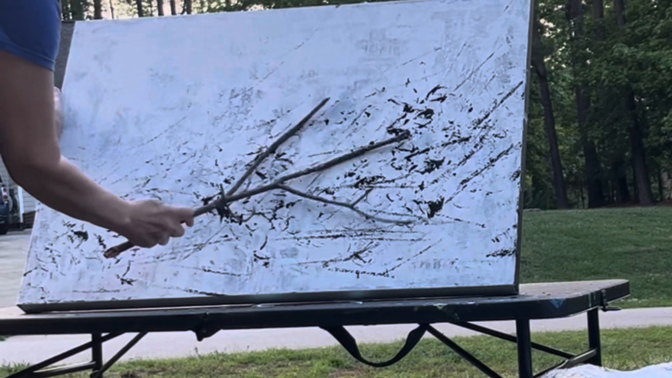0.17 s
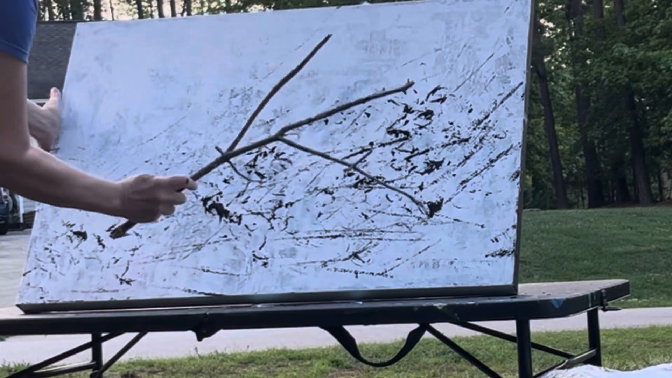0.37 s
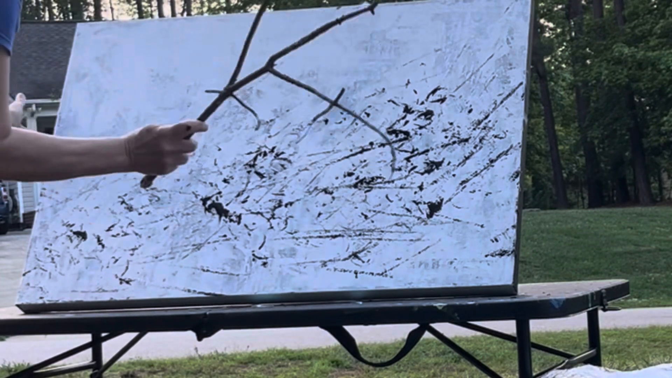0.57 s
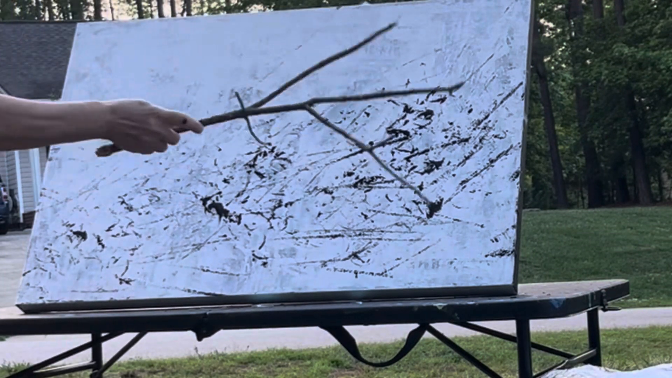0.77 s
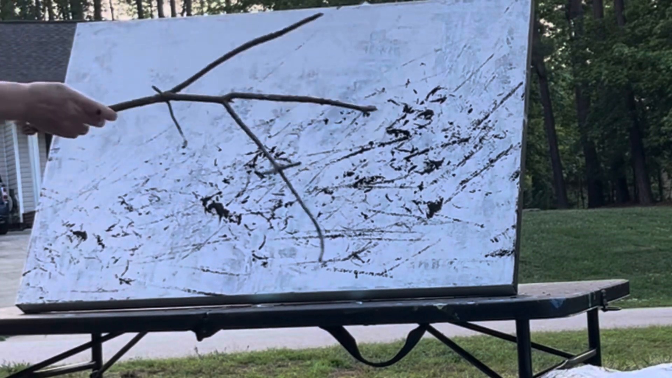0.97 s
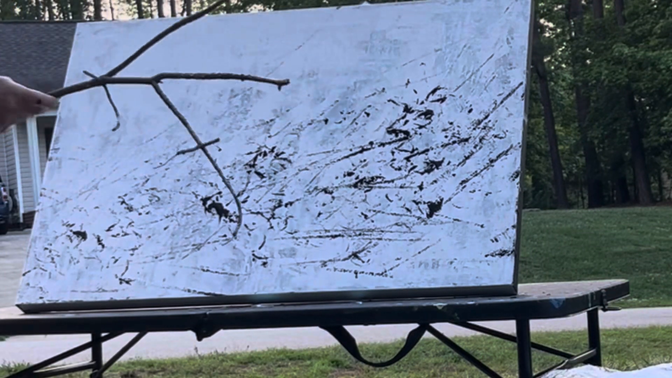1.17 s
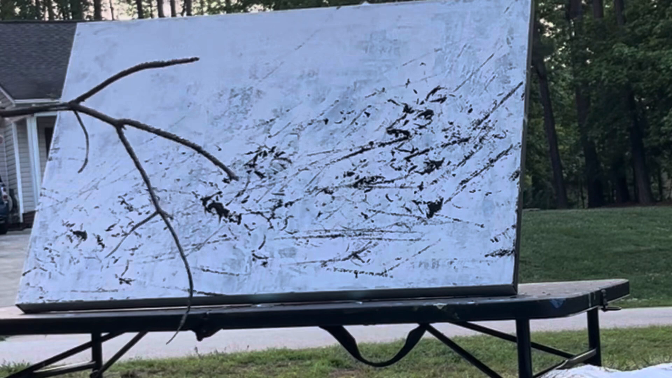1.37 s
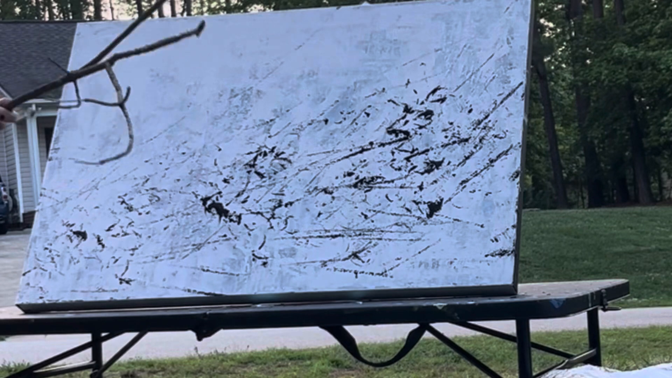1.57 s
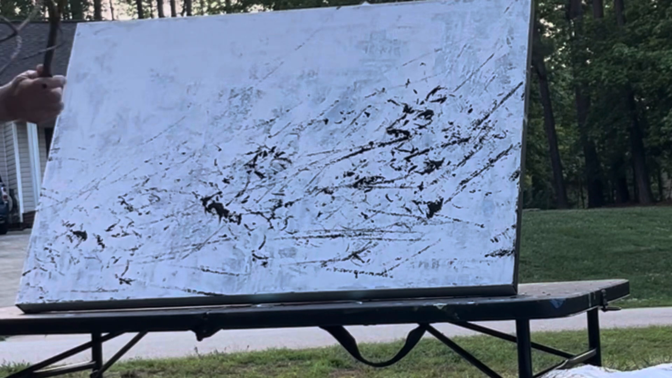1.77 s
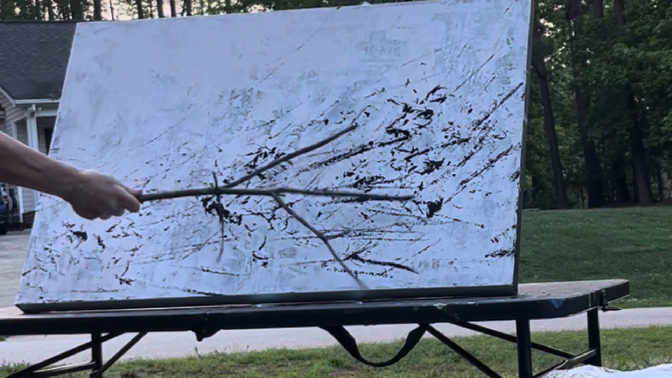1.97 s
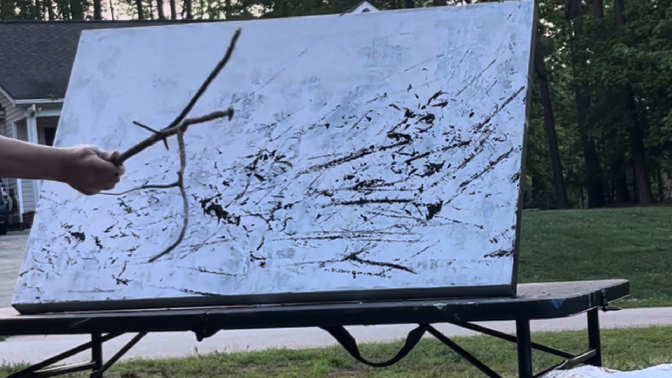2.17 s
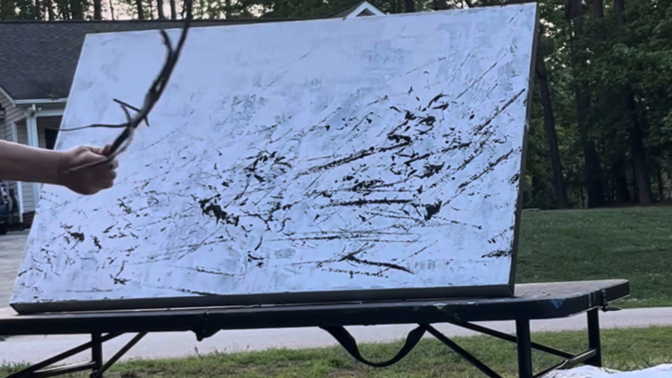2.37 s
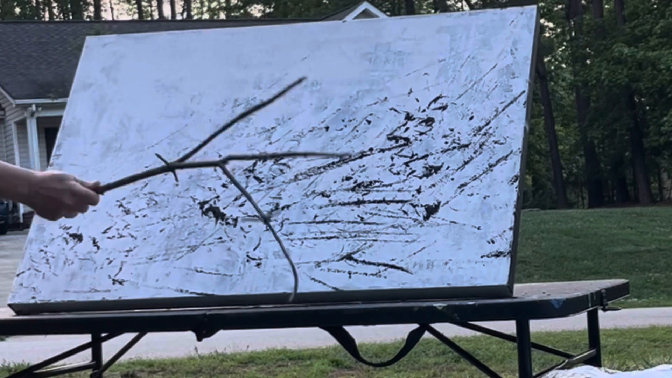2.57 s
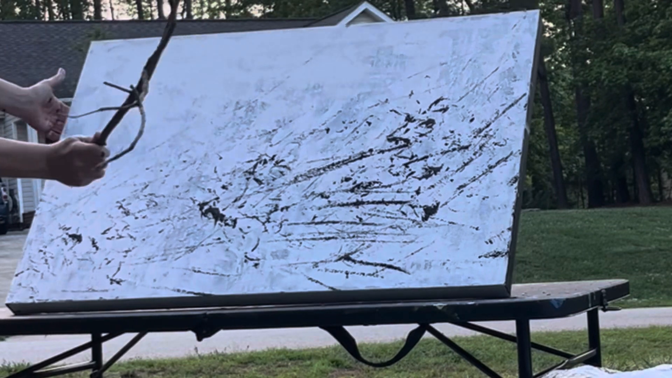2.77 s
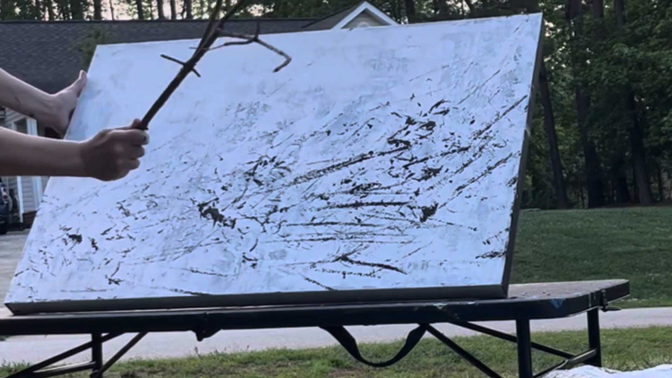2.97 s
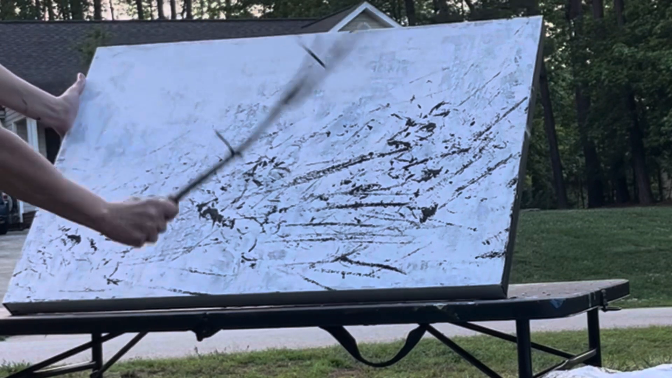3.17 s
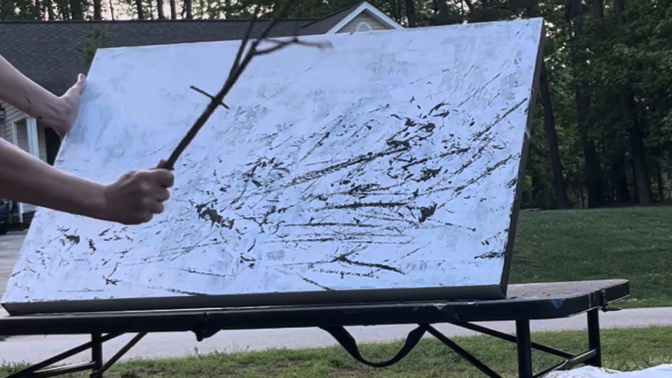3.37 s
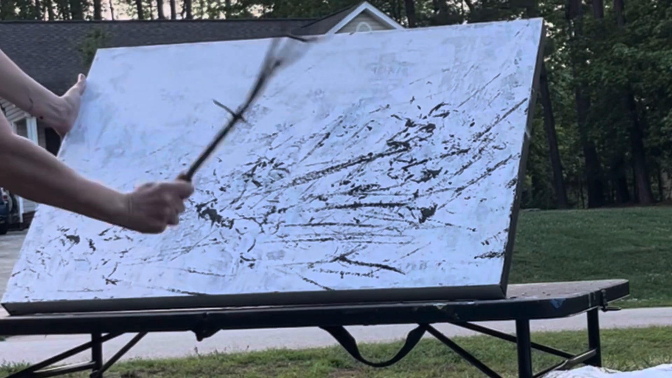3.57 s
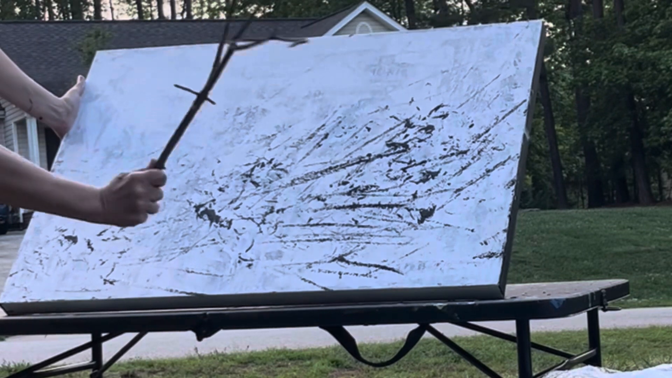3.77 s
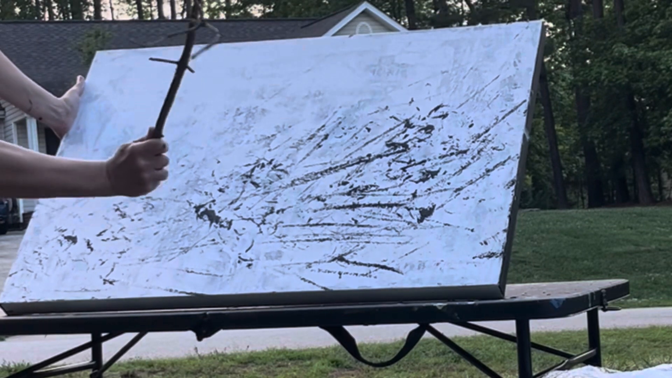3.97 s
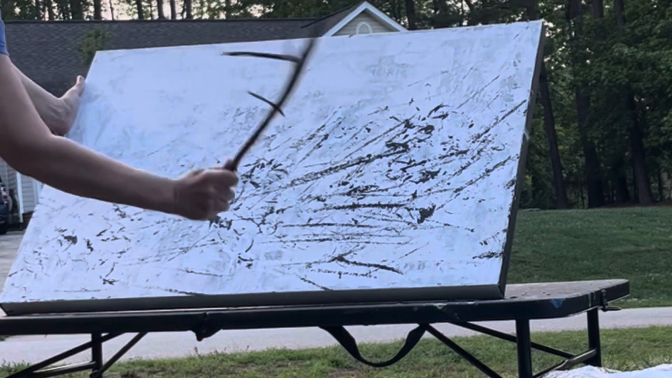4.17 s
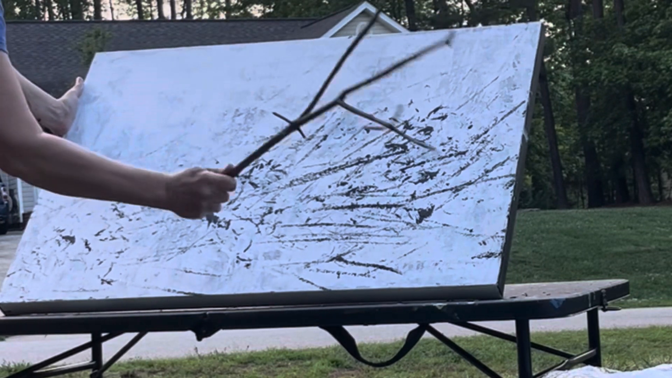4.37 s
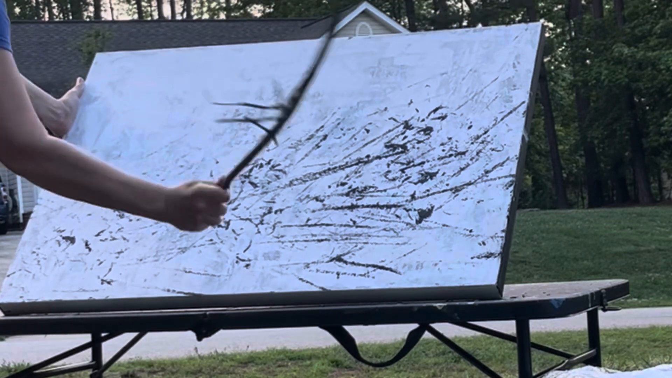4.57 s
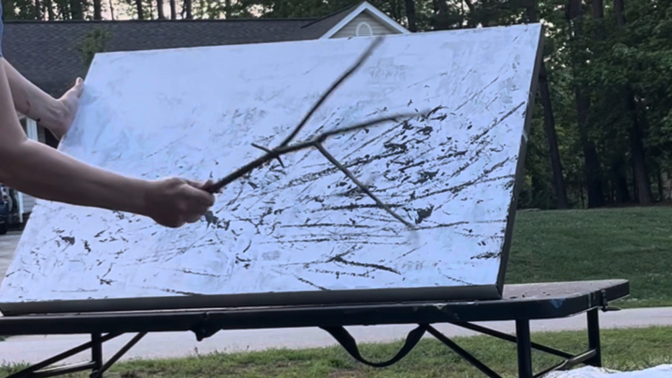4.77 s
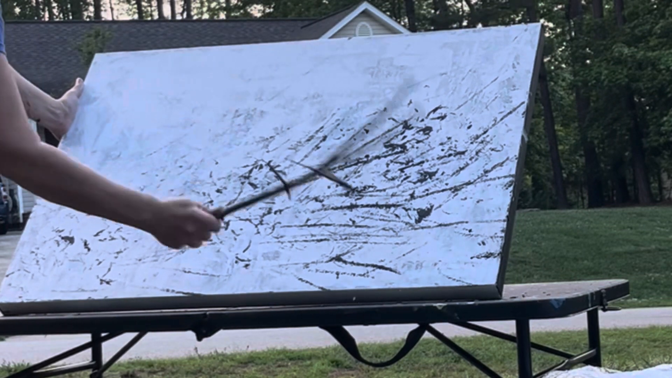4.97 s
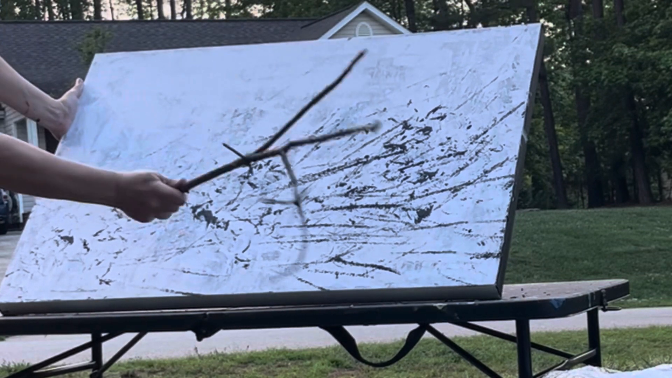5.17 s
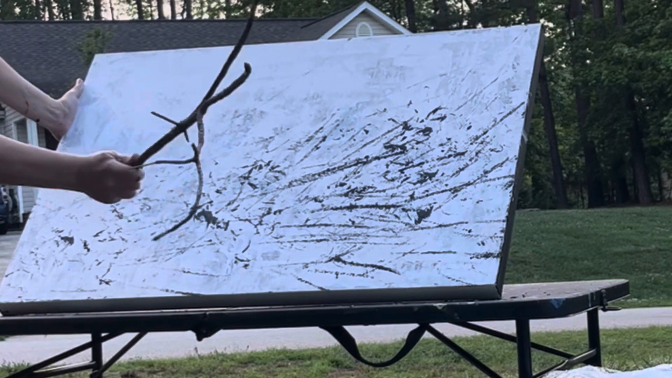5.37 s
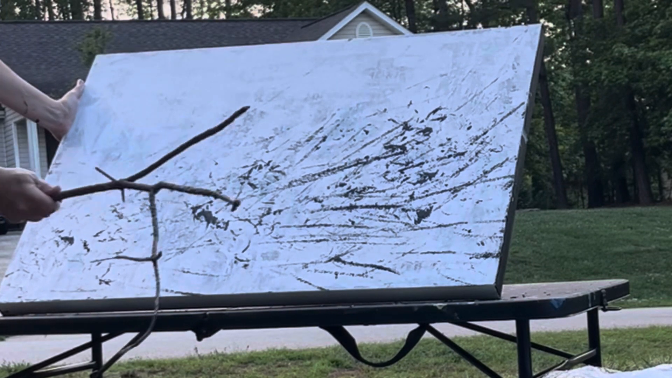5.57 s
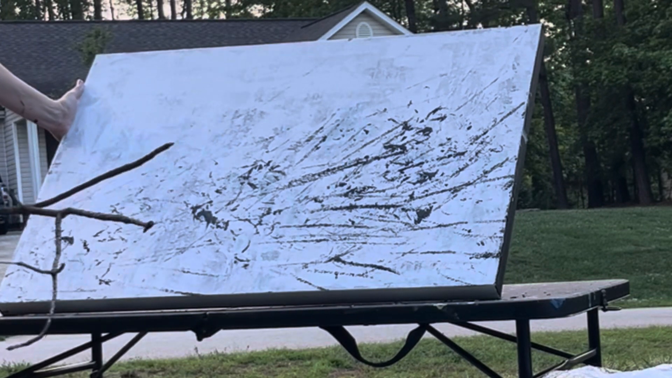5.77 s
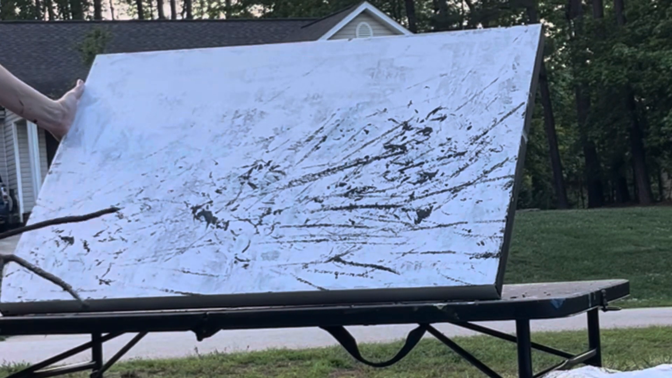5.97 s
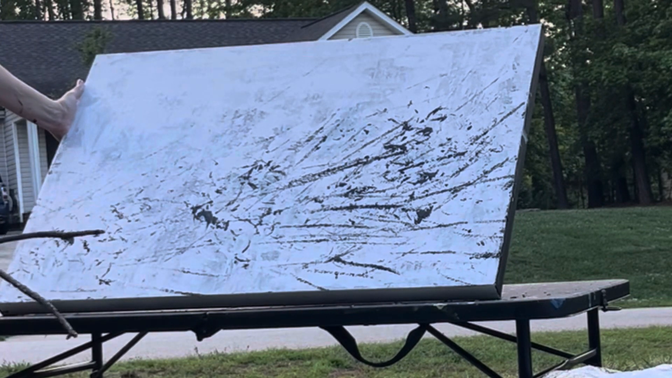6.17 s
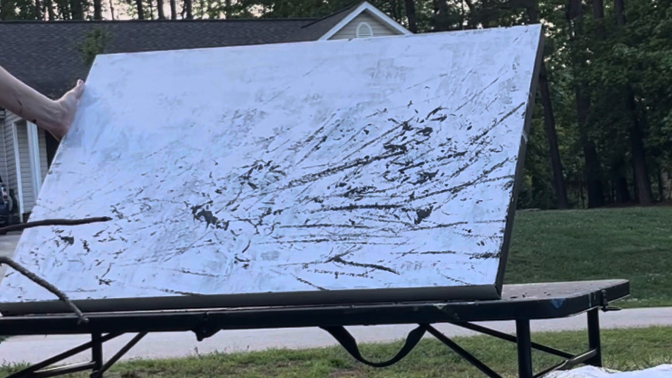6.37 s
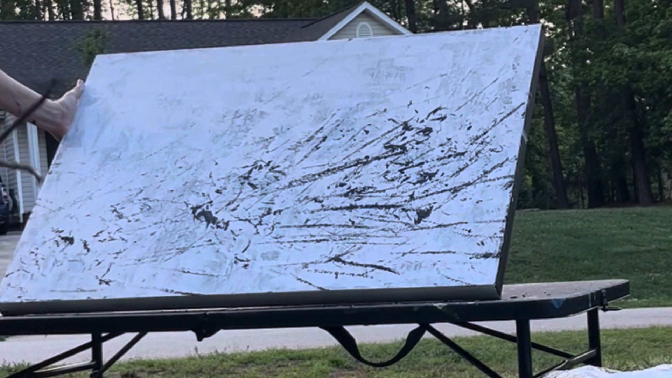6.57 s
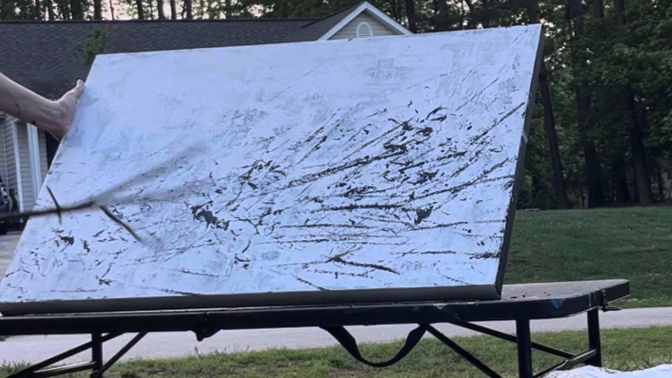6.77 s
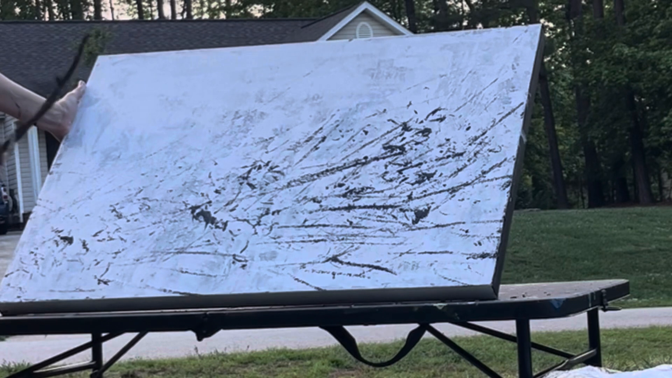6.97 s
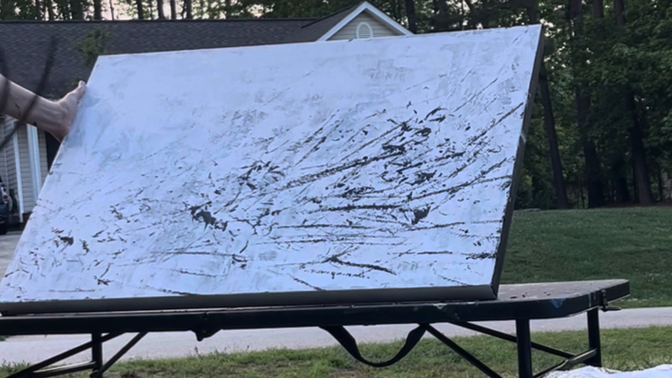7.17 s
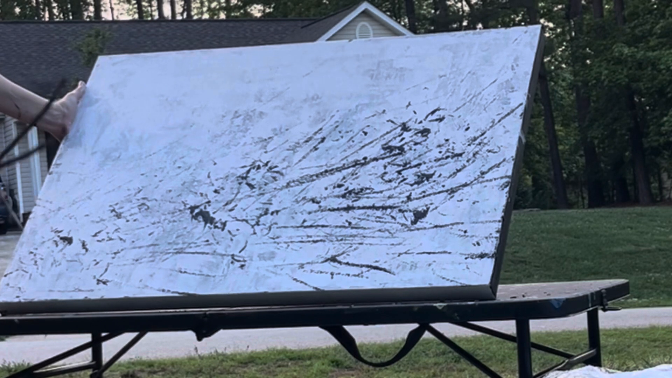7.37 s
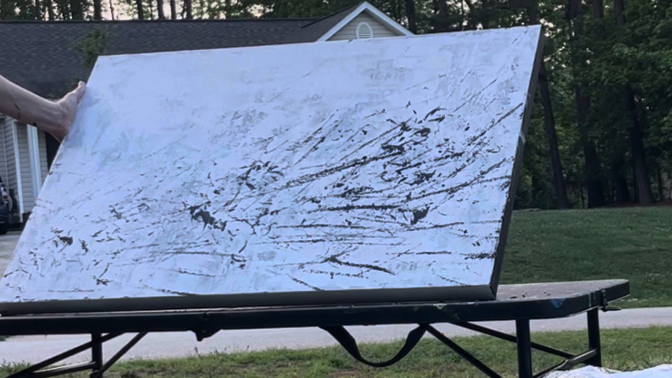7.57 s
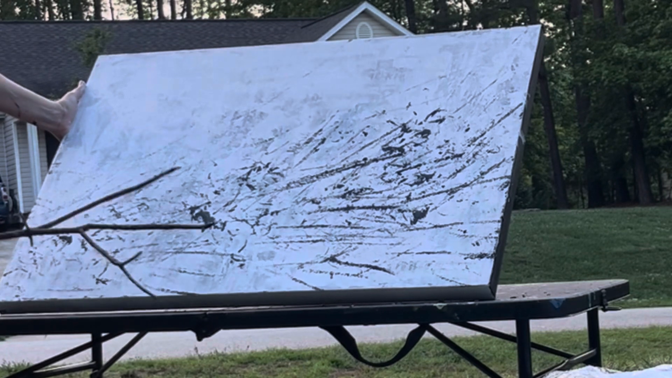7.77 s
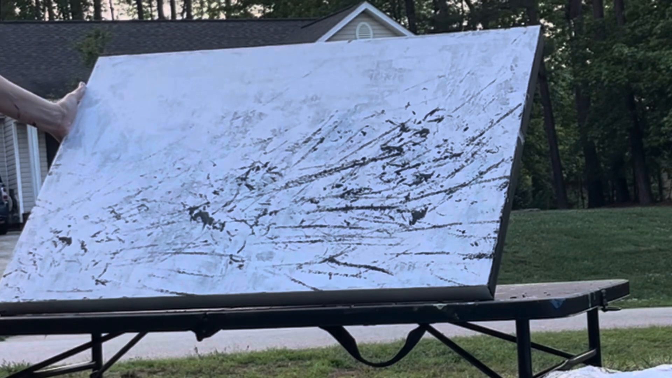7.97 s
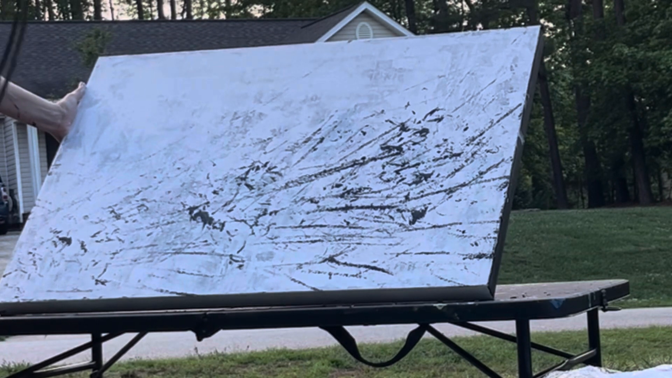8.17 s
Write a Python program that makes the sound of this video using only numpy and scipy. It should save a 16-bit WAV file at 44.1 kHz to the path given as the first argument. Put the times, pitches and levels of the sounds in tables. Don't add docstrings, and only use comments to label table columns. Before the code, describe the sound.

A bare forked branch whips a stretched canvas outdoors in sharp, rattling slaps, each with a low drum-like thump, over birdsong and distant traffic rumble.

```python
import sys
import numpy as np
from scipy import signal
from scipy.fft import rfft, irfft, next_fast_len
from scipy.io import wavfile
from scipy.ndimage import uniform_filter1d, minimum_filter1d

SR = 44100
rng = np.random.default_rng(int(sys.argv[2]) if len(sys.argv) > 2 else 0)


def level_to_linear(level):
    exponent = np.asarray(level, float) / 20
    return 10 ** exponent


def wav_record(signal):
    frames = np.transpose(np.atleast_2d(signal))
    bounded = np.clip(frames, -1, 1)
    quanta = np.round(bounded * 32767).astype(np.int16)
    wavfile.write(sys.argv[1], SR, quanta)


N = 362457
T = np.arange(N) / SR
SIZE = next_fast_len(N + SR // 4)
HZ = np.maximum(np.arange(SIZE // 2 + 1) * SR / SIZE, 1)

# start_s, shove_db, slap_hz
STROKES = [(0.144, -0.5, 900), (1.945, 2.2, 1000), (2.446, -.5, 951), (3.19, -1.1, 1000),
           (3.602, -1.3, 980), (4.216, -0.65, 1060), (4.626, -3.5, 1060), (5.001, -3.5, 1060),
           (6.788, -5, 1020), (7.226, -0.6, 960), (7.704, -1, 1020)]
# swish_db, carry_into_garden_db, brightness_db_per_octave, whistle_hz
SWINGS = [(-54.5, -3.5, -2.16, 3000), (-38, 0.5, 0.34, 3300), (-50, 2.7, 0.66, 3300),
          (-38, 0.55, 0.53, 3300), (-35, -.5, 0.13, 3100), (-36, 1.3, 0.34, 3250), (-33, 1.6, 1.2, 2750),
          (-41, -2, 0.47, 2700), (-30, 0.2, 0.3, 2750), (-40, 0.8, 0.85, 3000), (-40, -1.5, 0, 2700)]
# mode2_db, mode3_db, mode4_db
WOOD = [(2050, -7, -11, -30), (1900, -9, -19, -26), (1950, -1, -5, -4), (1900, -2, -8, -14),
        (2250, -1, -7, -14), (1850, -1, -5, -11), (1900, -8, -11, -13), (2000, -11, -10, -16),
        (1750, -8, -10, -7), (2100, -8, -3, -12), (2100, -4, -6, -18)]
# start_s, snap_db, slap_minus_snap_db, top_minus_snap_db
TWIGS = [(0.1434, -11.1, -3.2, -21.4), (0.1455, -14.1, 1.9, -8.0), (0.1471, -29.0, 10.4, -6.3),
         (0.151, -20.8, 10.3, -15.1), (1.9453, -4.3, 1.2, -12.3), (1.9495, -8.9, 7.1, -10.3),
         (1.9548, -18.6, 8.8, -4.4), (2.4455, -6.7, 2.6, -13.8), (2.4482, -12.7, 9.2, -2.7),
         (2.4535, -10.6, -1.0, -15.0), (2.4555, -14.6, -11.7, -8.4), (2.4578, -18.7, -15.8, -21.6),
         (3.1883, -4.9, 2.2, -15.7), (3.1916, -7.1, 2.8, -8.6), (3.1959, -9.8, 3.0, -9.5),
         (3.6027, -3.7, 2.0, -14.2), (3.605, -3.3, 0.1, -11.2), (3.6092, -16.1, 6.6, -9.0),
         (4.2166, -6.5, 5.2, -9.0), (4.2186, -4.9, 2.6, -11.1), (4.2216, -17.6, 5.8, -9.4),
         (4.6237, -8.6, 5.7, -14.6), (4.6259, -3.7, -0.1, -13.1), (4.6302, -11.8, 2.9, -9.5),
         (4.6321, -13.1, -12.2, -7.3), (4.6361, -19.5, -12.9, -17.4), (4.6376, -27.1, -2.3, -11.6),
         (5.0004, -8.8, 3.7, -11.3), (5.0024, -5.8, 4.0, -9.3), (5.0057, -24.3, 10.8, -8.5),
         (5.0352, -35, 10, -14), (6.7878, -5, 1.5, -13), (6.7892, -10, 4.5, -11),
         (7.2249, -8.5, -0.4, -10.9), (7.2298, -10.5, 4.6, -3.6), (7.2348, -17.4, -1.8, -6.6),
         (7.2366, -8.6, -4.6, -6.5), (7.2385, -13.7, -8.9, -5.1), (7.2402, -19.4, -6.2, -3.5),
         (7.2588, -30, -10, -14), (7.2433, -26, -4, -10), (7.7032, -12.5, 2.7, -9.5),
         (7.7049, -23.1, 10.4, -9.8), (7.7083, -14.3, 8.9, -2.4), (7.7104, -18.3, -3.0, -12.7),
         (7.7126, -11.3, -2.2, -8.7), (7.7149, -16.5, -9.0, -14.2)]
# start_s, level_db, top_minus_level_db
TICKS = [(0.2014, -33, -11), (0.209, -46, -11.5), (.158, -39, -11), (.226, -43, -25), (.262, -48, -25),
         (.274, -46, -25), (1.413, -60, -3), (1.53, -64, 3), (2.476, -40, -10), (2.501, -39, 1),
         (2.68, -61, -3), (2.779, -63, -5.5), (3.2214, -23.5, -18), (3.618, -30, -18), (6.826, -40, -15),
         (4.655, -45, -15), (5.025, -38, -3), (6.395, -72, -1.5), (6.802, -33, -13), (7.1, -47.5, -28),
         (7.552, -63, -10), (8.095, -58, -7)]
# centre_hz, width_hz, t60_s, share (the first lacks centre_hz: WOOD gives it)
SNAP_MODES = [(1000, .01, 2.0), (3330, 800, .011, -2.0), (4250, 800, .011, 2.0), (5050, 900, .01, -2.0),
              (3000, 3000, .01, .5)]
# centre_hz, width_hz, t60_s, share
TOP_MODES = [(6300, 1600, .005, -1.3), (7800, 3000, 0.0035, 1.5), (10400, 2400, .005, -.6),
             (13000, 3600, 0.0089, 1.25), (15800, 2000, .003, -.3)]
# mode_hz, level_db re the drum level, t60_s
DRUM = [(57.75, -4, 1.7), (107, -12, 0.72), (126.6, -10, .5), (199, -21, 0.18)]
# start_s, pitch_hz, level_db
FLAPS = [(0.162, 80, -17), (0.149, 205, -18), (0.1444, 385, -8.0), (0.1431, 590, -11.3), (1.949, 195, -6.2),
         (1.9537, 330, -9.4), (1.9465, 450, -12), (2.446, 570, -13), (3.604, 420, -14), (5.0, 780, -13),
         (3.602, 770, -13), (1.9447, 680, -9.8), (2.4475, 220, -11.6), (2.4451, 352, -7.4),
         (2.4449, 720, -9.1), (3.1956, 180, -12.5), (3.1905, 310, -13.5), (3.1882, 578, -4.1),
         (3.6105, 145, -13.5), (3.6143, 312, -14.3), (3.6021, 520, -10.8), (4.2251, 185, -14),
         (4.2206, 282, -10.4), (4.2158, 560, -8.9), (4.66, 125, -24.0), (4.6274, 305, -10.5),
         (4.6236, 510, -7.0), (4.999, 190, -16.4), (5.005, 290, -11.8), (4.999, 560, -10.8),
         (6.7873, 200, -15.5), (6.7904, 282, -15.8), (6.7868, 560, -16.1), (7.2253, 209, -10.2),
         (7.2254, 385, -8.7), (7.2237, 590, -13.3), (7.706, 212, -5.6), (7.7069, 390, -4.7),
         (7.7077, 640, -14.7)]
# start_s, pitch_hz, level_db
THUMPS = [(0.1455, 128, -15), (1.9475, 69, -16.5), (2.4435, 88, -13), (3.196, 92, -8.5), (3.611, 92, -9.5),
          (4.2186, 92, -13.5), (4.6247, 107, -15), (5.002, 110, -13.5), (6.7835, 125, -16),
          (7.2283, 115, -12), (7.7075, 83, -15.5)]
# start_s, centre_hz, width_hz, level_db, t60_s
GRIT = [
    (7.24, 4300, 1700, -40, .55),
    (4.64, 4400, 2000, -46, .5),
    (2.66, 2300, 1500, -58, 1),
    (6.81, 5200, 3500, -46, .5),
    (7.24, 650, 400, -43, .6),
    (6.8, 900, 400, -43, .6),
    (3.63, 5500, 4000, -47, .5),
    (5.03, 800, 400, -44, .5),
]
# delay_s, level_db
WALLS = [
    (0.034, -35),
    (.058, -28),
    (0.134, -43),
    (.231, -39),
    (.269, -44),
    (.328, -44),
]
# start_s, level_db
RISERS = [
    (7.486, -68),
    (7.605, -67),
    (7.825, -67),
    (7.942, -63),
    (8.055, -61),
    (8.168, -66),
]
# delay_s, length_s, start_hz, middle_hz, end_hz, level_db
RISE = [
    (0, 0.03, 3530, 4500, 5350, -4),
    (0.038, .05, 5950, 5930, 5970, -5.5),
]
# start_s, length_s, top_hz, ends_share_of_top, level_db
ARCHES = [(0.301, 0.058, 4160, .97, -75), (1.36, 0.093, 4230, 0.94, -78), (1.77, 0.068, 4300, 0.98, -76),
          (5.39, 0.026, 4400, 0.91, -55.5), (5.432, 0.046, 3760, 0.84, -60.5),
          (5.43, 0.038, 4310, .89, -60.5), (5.983, 0.043, 4310, 0.9, -61), (6.028, 0.07, 4260, 0.99, -70),
          (6.585, 0.045, 4480, .91, -59), (6.635, 0.11, 4420, .98, -67), (7.588, .04, 3480, 0.9, -56),
          (6.415, .028, 3400, .9, -64), (8.174, 0.046, 3560, 0.83, -55.5), (8.174, 0.044, 4060, 0.88, -60)]
# start_s, length_s, start_hz, end_hz, level_db
FALLS = [(4.505, 0.025, 4400, 3660, -61.5), (5.191, 0.017, 3900, 3700, -63),
         (5.508, 0.038, 3910, 3730, -57.5), (5.515, 0.042, 4280, 3080, -57.5),
         (5.741, 0.037, 4320, 3850, -69.5), (5.746, 0.027, 3850, 3300, -65.5),
         (5.767, 0.043, 3400, 3340, -64.5), (6.082, .045, 3720, 2890, -62), (6.1, .03, 4120, 3800, -67),
         (5.41, .02, 4250, 3000, -58), (2.572, .035, 2600, 3400, -54), (5.765, .03, 3100, 2950, -68),
         (6.423, 0.03, 4000, 3950, -76), (7.122, 0.026, 3400, 3260, -64.5), (6.44, .022, 3250, 2750, -65),
         (7.625, .016, 3100, 2700, -64), (6.61, .02, 4400, 3850, -62)]
# start_s, level_db
CHIPS = [
    (.241, -55.5),
    (1.137, -56.5),
]
# delay_s, length_s, start_hz, middle_hz, end_hz, level_db
CHIP = [
    (0.0, .019, 9300, 7920, 9600, .1),
    (.024, .019, 9300, 7920, 9600, -9),
    (.058, .019, 9300, 7920, 9600, -14),
]
# start_s, level_db
SWOOPS = [
    (5.862, -61),
    (6.229, -62.5),
]
# delay_s, length_s, start_hz, middle_hz, end_hz, level_db
SWOOP = [
    (0.0, .064, 3900, 3560, 2500, 0),
    (.064, .02, 2500, 2850, 3400, -2),
    (.015, .065, 3300, 3380, 3340, -3),
]
# start_s, level_db
DIPS = [
    (8.041, -59),
]
# delay_s, length_s, start_hz, middle_hz, end_hz, level_db
DIP = [
    (0, .008, 9300, 8000, 6300, -2),
    (.008, .007, 6300, 8000, 9900, 0),
]
# start_s, length_s, centre_hz, level_db
BUZZ = [(.25, .7, 12500, -83), (0.603, 0.23, 12500, -82), (0.948, .5, 12600, -87),
        (1.38, 0.074, 12000, -78), (1.38, .08, 7600, -77), (1.553, .4, 12500, -90),
        (1.8, 0.18, 8000, -81.5), (5.623, 0.16, 8200, -81), (5.8, 0.21, 8100, -77.5),
        (6.57, 0.1, 8300, -84), (8.073, 0.17, 8200, -83.5), (2.81, 0.05, 2600, -63),
        (5.207, 0.12, 1000, -58), (6.999, 0.17, 2200, -64), (1.072, 0.078, 125, -44)]
# time_s, rumble_db
TRAFFIC = [
    (0.0, -40.5),
    (0.4, -47),
    (1.19, -41),
    (1.9, -42.5),
    (3.0, -42.5),
    (4.4, -42.5),
    (5.5, -44.5),
    (6.2, -44.5),
    (6.9, -41.5),
    (8.2, -47),
]
# pitch_hz, density_db_per_hz
GARDEN = [(30, -12), (59, -1), (85, -3.5), (150, -12.5), (270, -22.5), (520, -27), (1000, -29), (1800, -37),
          (2600, -39.5), (4200, -40), (5500, -47), (7000, -63.5), (12500, -63), (16000, -88)]
# pitch_hz, level_db
AFTER = [(70, -26.5), (250, -31.5), (900, -42), (3800, -39.3), (10000, -37)]
# pitch_hz, level_db, early_t60_s, late_db, late_t60_s
TAIL = [(60.3, -8, 1, -5, 2.2), (134, 4.5, 0.38, -14, 1.1), (300, 0, 0.35, -15.5, 1),
        (904.4, -0.5, 0.34, -14.5, 1.3), (2500, -5, 0.24, -14.5, 1.8), (4400, -2, 0.3, -9.5, 0.66),
        (8000, -18.5, 0.041, -7, .75), (13400, -7, 0.1, -8.5, 0.2), (15500, -42.5, .15, -18, .3)]
# pitch_hz, likeness_share
LIKENESS = [(120, 1), (300, 0.98), (700, 0.4), (2000, 0.4), (2700, .3), (5000, 0.24), (5700, 0.91),
            (8000, 0.8)]
# pitch_hz, left_lead_rad, left_minus_right_db
PORTS = [(0, -.06, -.3), (350, -.36, -.7), (850, -.6, -.3), (1650, -.3, .6), (2500, 1.7, -4),
         (4300, 1.25, -3), (5000, 1.3, 0), (5500, 2.7, .3)]


def on_log(table, hz, column=1):
    table = np.array(table)
    return np.interp(np.log(hz), np.log(table[:, 0]), table[:, column])


def ring(x, hz, width):
    return signal.lfilter(*signal.iirpeak(hz, hz / width, fs=SR), x)


def ring_twice(x, hz, width):
    return ring(ring(x, hz, width), hz, width)


def fade(t, t60):
    return (t >= 0) * level_to_linear(-60 * np.maximum(t, 0) / t60)


def add(out, s, x):
    i = int(s * SR)
    out[..., i:i + x.shape[-1]] += x[..., :out.shape[-1] - i]


def spread(mid, side):
    like = np.clip(on_log(LIKENESS, HZ), 0, 1)
    mid, side = mid * np.sqrt(1 + like), side * np.sqrt(1 - like)
    return irfft(np.array([mid + side, mid - side]), SIZE)[:, :N]


def landing(modes, chance, grit_share, length):
    t = np.arange(len(chance)) / SR
    push = grit_share * chance + (t == 0)
    x = 0
    for hz, width, t60, share in modes:
        x = x + share * ring_twice(push * fade(t, t60 * length), hz, width)
    return x / abs(x).max()


def twigs():
    out = np.zeros(N)
    rows = [(*row, 1.214) for row in TWIGS]
    rows += [(s, db + 2.5, 2.5, top_db, 0.2) for s, db, top_db in TICKS]
    chances = rng.standard_normal((len(rows), 3, 2000))
    for (s, db, slap_db, top_db, length), (slap_chance, wood_chance, top_chance) in zip(rows, chances):
        stroke = abs(np.array(STROKES)[:, 0] - s).argmin()
        slap_modes = [(STROKES[stroke][-1], 470, .014, 1)]
        slap = landing(slap_modes, slap_chance, .03, length)

        low_hz, *upper_db = WOOD[stroke]
        modes = [(low_hz, *SNAP_MODES[0])] + SNAP_MODES[1:]
        size = np.exp(.03 * wood_chance[-1])
        wood_modes = [(hz * size, width, t60, share * level_to_linear(mode_db))
                      for (hz, width, t60, share), mode_db in zip(modes, [0, *upper_db, 0])]
        snap = landing(wood_modes, wood_chance, .14, length)
        top = landing(TOP_MODES, top_chance, 0.059, length)

        add(out, s - .0003, level_to_linear(db + 1.2) * (snap + level_to_linear(top_db + 3.5) * top))
        add(out, s - .0004, level_to_linear(db + slap_db + .3) * slap)
    return out


def canvas():
    out, t, lead = np.zeros(N), T[:SR], T[:SR // 25]
    chance = rng.standard_normal((len(STROKES), len(DRUM), 2))
    air = rng.standard_normal((len(STROKES), len(lead)))
    for (s, shove_db, _), (swish_db, *_, whistle_hz), c, a in zip(STROKES, SWINGS, chance, air):
        whistling = ring_twice(a, whistle_hz, 260)
        swish = 2.6 * whistling + .3 * ring(a, 3000, 2400) + .5 * ring_twice(a, 950, 900)
        approach = fade(lead[::-1], .055)
        add(out, s - lead[-1], level_to_linear(swish_db + 4.0) * swish * approach)
        for (hz, db, t60), (detune, gain) in zip(DRUM, c):
            tone = np.sin(2 * np.pi * hz * (1 + .02 * detune) * t)
            mode = tone * fade(t, t60) * np.minimum(t / .02, 1)
            add(out, s, level_to_linear(-28.5 + shove_db + db + 1.5 * gain) * mode)
    motions = [(*row, .4 * row[1]) for row in FLAPS] + [(*row, 62) for row in THUMPS]
    shove = 1. * (t[:SR // 10] == 0)
    for s, hz, db, width in motions:
        x = ring_twice(shove, hz, width)
        add(out, s, level_to_linear(db) * x / abs(x).max())
    return out


def grit():
    out, t = np.zeros(N), T[:SR // 2]
    grain = int(.003 * SR)
    for s, hz, width, db, t60 in GRIT:
        grains_db = 4 * np.repeat(rng.standard_normal(len(t) // grain + 1), grain)[:len(t)]
        x = ring_twice(rng.standard_normal(len(t)) * level_to_linear(grains_db), hz, width)
        add(out, s, level_to_linear(db) * x / x.std() * fade(t, t60) * np.minimum(t / .01, 1))
    return out


def houses(near):
    echo, t = np.zeros((2, SR // 2)), T[:SR // 20]
    for (s, db), c in zip(WALLS, rng.standard_normal((len(WALLS), 2, len(t)))):
        add(echo, s, level_to_linear(db - 27) * c * fade(t, 0.15))
    dull = 1 / (1 + (HZ / 4500) ** 2) / np.sqrt(1 + (700 / HZ) ** 1.5)
    dull = dull * (1 - .45 * np.exp(-(np.log2(HZ / 980) / .3) ** 2))
    return spread(*rfft(echo, SIZE) * rfft(near, SIZE) * dull)


def whistle(hz, db):
    flutter, wobble = uniform_filter1d(rng.standard_normal((2, len(hz))), size=130)
    level = level_to_linear(db + 2.0 + 25 * flutter) * np.hanning(len(hz)) ** 0.26
    phase = 2 * np.pi * np.cumsum(hz * (1 + 0.16 * wobble)) / SR
    return level * np.sin(phase)


def birds():
    out = np.zeros(N)
    notes = [(s, length, ends * hz, hz, ends * hz, db) for s, length, hz, ends, db in ARCHES]
    notes += [(s, length, a, a + .3 * (b - a), b, db) for s, length, a, b, db in FALLS]
    for calls, parts in (RISERS, RISE), (CHIPS, CHIP), (DIPS, DIP), (SWOOPS, SWOOP):
        notes += [(s + delay, *track, db + part_db) for s, db in calls for delay, *track, part_db in parts]
    for s, length, *track_hz, db in notes:
        u = np.linspace(0, 1, int(length * SR))
        glide = np.polyfit([0, .5, 1], track_hz, 2)
        add(out, s, whistle(np.polyval(glide, u), db))
    for s, length, hz, db in BUZZ:
        x = ring_twice(rng.standard_normal(int(length * SR)), hz, hz / 5.5)
        add(out, s, level_to_linear(db) * x / x.std() * np.hanning(len(x)))
    trees = rng.standard_normal((2, SR // 2)) * fade(T[:SR // 2] - .006, 0.6)
    return out + level_to_linear(-41) * spread(*rfft(trees, SIZE) * rfft(out, SIZE))


def walk(rate):
    k = int(SR / rate)
    held = np.repeat(rng.standard_normal(N // k + 1), k)
    return 1.3 * uniform_filter1d(uniform_filter1d(held, k), k)[:N]


def band_noise(hz):
    shape = np.exp(-(np.log2(HZ / hz) / 0.4) ** 2)
    chance = rng.standard_normal((2, len(HZ))) + 1j * rng.standard_normal((2, len(HZ)))
    pair = spread(*shape * chance)
    return pair / pair.std()


def garden():
    out, t, trunks = 0, T[:2 * SR], walk(70)
    rumble_db = np.interp(T, *np.transpose(TRAFFIC)) + 47
    for s, *_ in STROKES:
        add(rumble_db, s, 5.5 * t / 0.13 * np.exp(1 - t / 0.13))
    for hz in 30 * 2 ** np.arange(0, 9.1, .5):
        bass_share = np.clip(400 / hz - .3, 0, 1)
        band_db = on_log(GARDEN, hz) + 10 * np.log10(hz / 60) - 52
        db = band_db + bass_share * rumble_db + 1.1 * walk(4.0)
        power, back = level_to_linear(2 * db), np.zeros(N)
        start_db, early, late_db, late = (on_log(TAIL, hz, column=k) for k in (1, 2, 3, 4))
        decay = fade(t, early) ** 2 + level_to_linear(2 * late_db) * fade(t, late) ** 2
        decay = decay * np.minimum(t / (0.0027 + 2.5 / hz), 1)
        for (s, *_), (_, carry_db, tilt_db, _) in zip(STROKES, SWINGS):
            sent_db = on_log(AFTER, hz) + carry_db + tilt_db * np.log2(hz / 900)
            add(back, s, level_to_linear(2 * (start_db + sent_db)) * decay)
        flashes = .7 * trunks + .7 * walk(45)
        power = power + back * level_to_linear(2 * 1.8 * min(hz / 600, 1) * flashes)
        out = out + np.sqrt(power) * level_to_linear(1.5 * walk(22)) * band_noise(hz)
    return out


def scene():
    near = twigs() + canvas()
    return near + houses(near) + garden() + birds() + grit()


def roll_off(x):
    return signal.sosfilt(signal.butter(12, 17070, fs=SR, output="sos"), x)


def record(dry):
    late_s = 0.013 * (np.maximum(HZ, 40) / 60) ** -1.1
    bass_cut = 1 / np.sqrt(1 + (50.6 / HZ) ** 9)
    colour = np.exp(-2j * np.pi * np.cumsum(late_s) * SR / SIZE) * bass_cut

    hz, lead, balance_db = np.transpose(PORTS)
    port_lag_s = .000226
    lead = np.interp(HZ, hz, lead) + 2 * np.pi * port_lag_s * np.maximum(HZ - hz[-1], 0)
    port = level_to_linear(np.interp(HZ, hz, balance_db) / 2) * np.exp(.5j * lead)
    x = irfft(rfft(dry, SIZE) * colour * np.array([port, 1 / port]), SIZE)[:, :N]

    ceiling = .86
    room_left = np.minimum(ceiling / (abs(x).max(axis=0) + 1e-9), 1)
    gain = uniform_filter1d(minimum_filter1d(room_left, size=65), size=65)
    treble_cut = signal.butter(16, 16150, fs=SR, output="sos")
    mix = signal.sosfilt(treble_cut, x * gain)
    return roll_off(mix)


dry = scene()
out = record(dry)
wav_record(out)
```